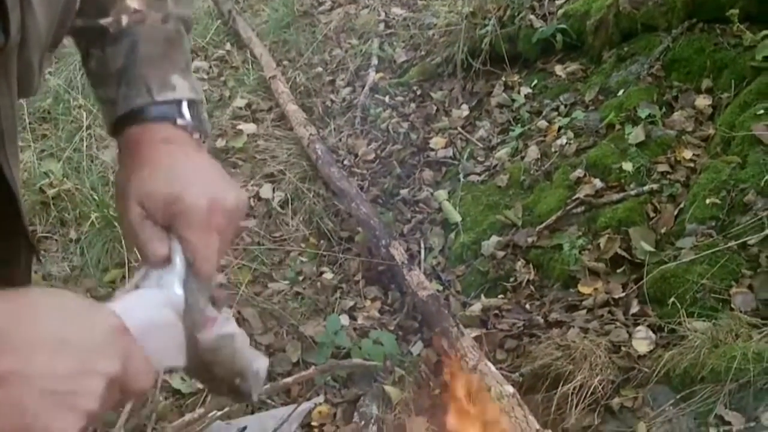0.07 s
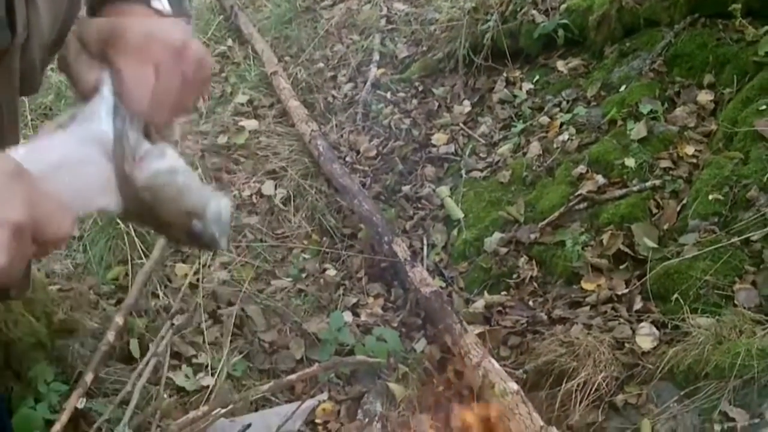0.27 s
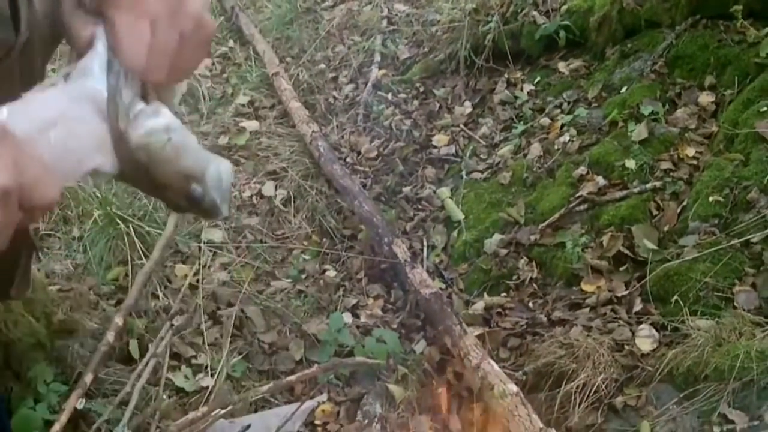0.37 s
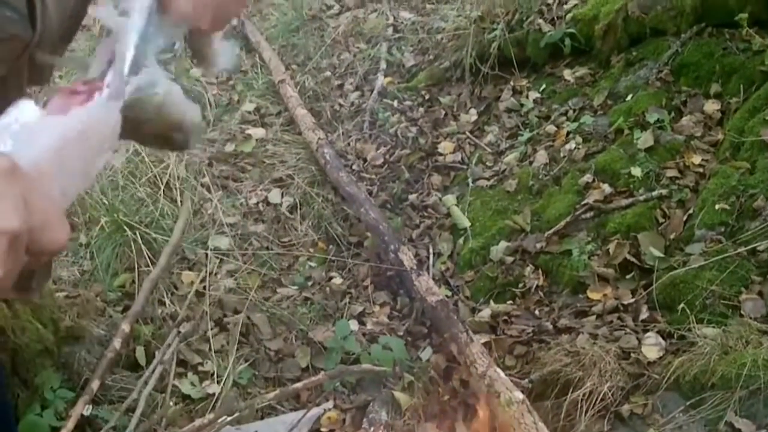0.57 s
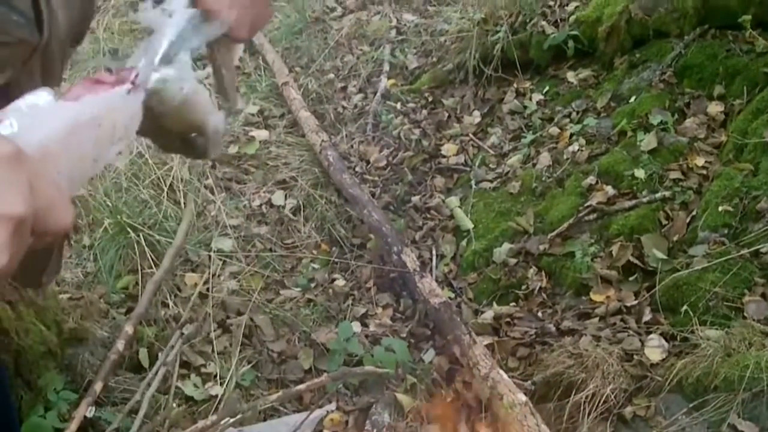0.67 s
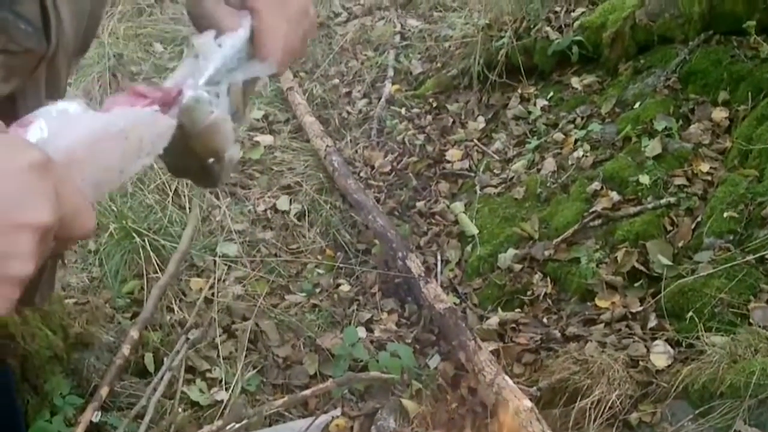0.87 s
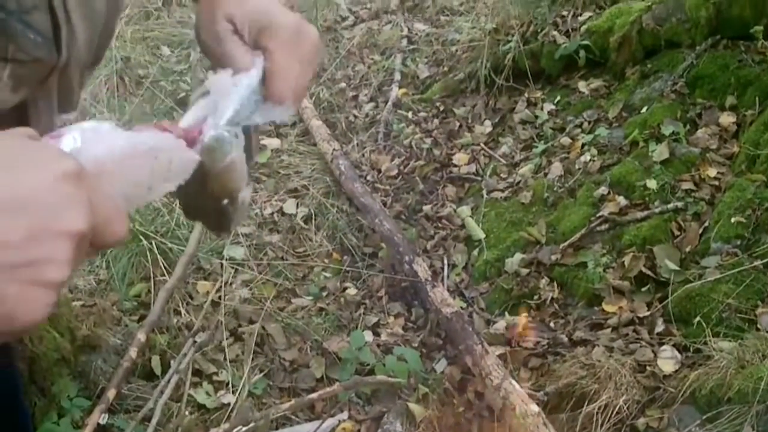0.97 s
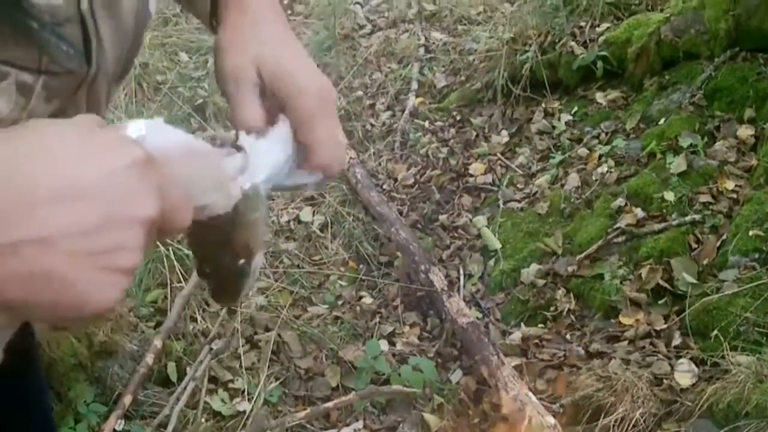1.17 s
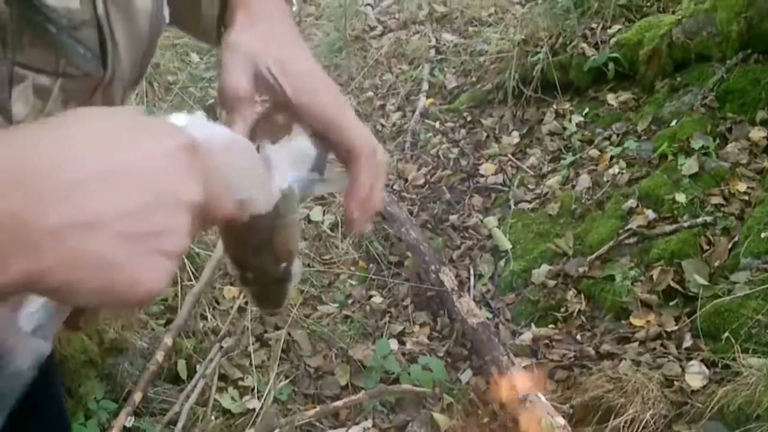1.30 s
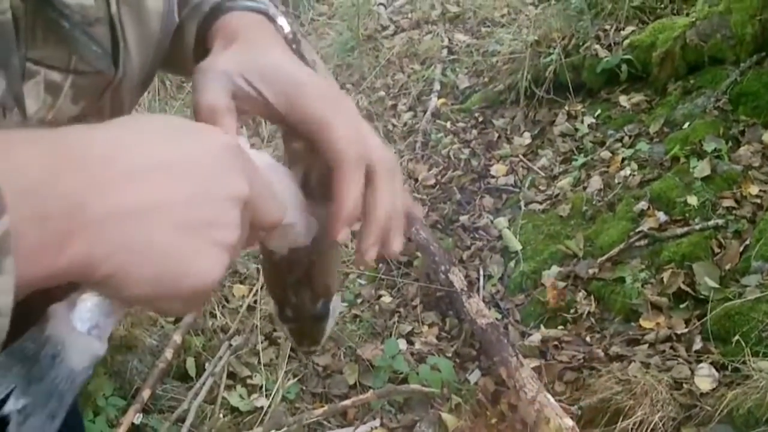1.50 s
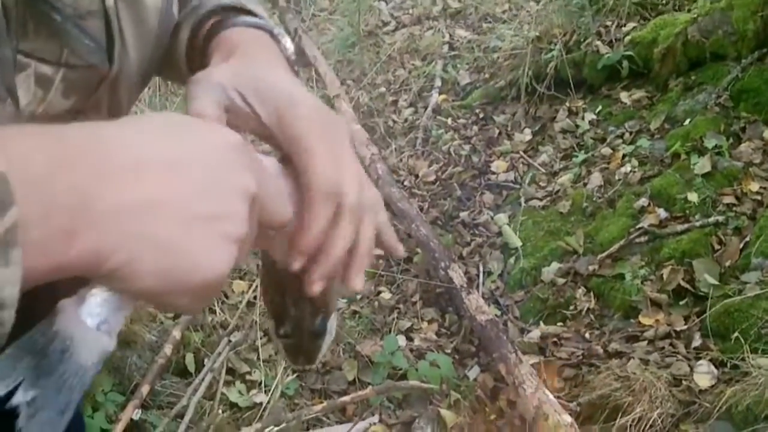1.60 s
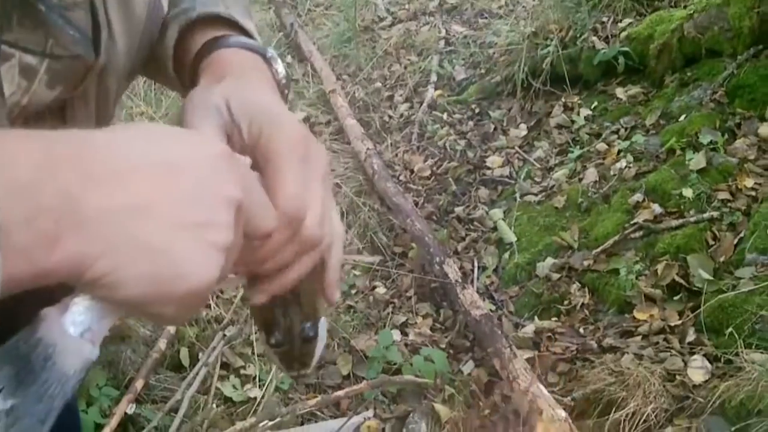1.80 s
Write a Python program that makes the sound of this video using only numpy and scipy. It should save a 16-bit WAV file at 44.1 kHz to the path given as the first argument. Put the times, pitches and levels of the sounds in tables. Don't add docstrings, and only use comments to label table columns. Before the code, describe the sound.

Fish skin is torn off by hand very close to the microphone: light ticks first, then a dense burst of sharp bright snaps and wet pops, then scattered cracks, over a quiet campfire rumble and sizzle outdoors.

```python
import sys
import numpy as np
from scipy import signal
from scipy.fft import rfft, irfft, next_fast_len
from scipy.io import wavfile
from scipy.ndimage import uniform_filter1d, map_coordinates

SR = 44100
rng = np.random.default_rng(int(sys.argv[2]) if len(sys.argv) > 2 else 0)


def dump(signal):
    limited = np.clip(np.atleast_2d(signal).T, -1, 1)
    pcm = np.round(limited * 32767).astype(np.int16)
    wavfile.write(sys.argv[1], SR, pcm)


def amplitude_ratio(level_db):
    exponent = np.asarray(level_db, float) / 20
    return 10 ** exponent


N = 81585
PRESENCE_DB = 16


def unit(x):
    return x / np.sqrt(np.mean(x ** 2) + 1e-20)


def curve(rows):
    time_s, value = np.transpose(rows)
    return np.interp(np.arange(N) / SR, time_s, value)


def wobble(rate):
    knots = rng.standard_normal(int(N * rate / SR) + 4)
    return map_coordinates(knots, [np.arange(N) * rate / SR])


def filtered(x, response):
    size = next_fast_len(N + 8192)
    spectrum = rfft(x, size) * response(np.fft.rfftfreq(size, 1 / SR))
    return irfft(spectrum, size)[..., :N]


def noise(points, channels):
    pitch_hz, level_db = np.transpose(points)

    def colour(hz):
        return amplitude_ratio(np.interp(np.log(hz + 1), np.log(pitch_hz), level_db))

    return unit(filtered(rng.standard_normal((channels, N)), colour))


def peak(hz, centre_hz, width_hz):
    return 1j * hz * width_hz / (centre_hz ** 2 - hz ** 2 + 1j * hz * width_hz)


def place(starts_s, rows):
    at = np.round(starts_s * SR).astype(int)[:, None] + np.arange(rows.shape[1])
    return np.bincount(at.ravel(), rows.ravel(), N + 4096)[:N]


def blips(table, tone, width, edge_db, tail_db, tail_s):
    start_s, level_db, pitch_hz, length_s = (c[:, None] for c in np.transpose(table))
    t, f = np.arange(1024) / SR, np.fft.rfftfreq(1024, 1 / SR)
    z = rng.standard_normal((len(table), 2, 1024))
    u = t / np.clip(length_s / 2.5, .00005, .002)
    rasp = irfft(rfft(z[:, 0]) * peak(f, pitch_hz, width * pitch_hz))
    rasp = rasp / rasp.std(axis=1, keepdims=True)
    ring = np.sin(2 * np.pi * pitch_hz * t)
    body = u * np.exp(1 - u) * (tone * ring + (1 - tone) * rasp)
    body = body / np.abs(body).max(axis=1, keepdims=True)
    tail = amplitude_ratio(tail_db - 60 * t / tail_s) * (1 - np.exp(-u)) * rasp
    edge = irfft(rfft(z[:, 1]) * peak(f, 6740, 34000))
    edge = amplitude_ratio(edge_db - 60 * t / 0.0013) * edge
    return place(start_s[:, 0], amplitude_ratio(level_db) * (body + tail + edge))


def grains(count, mean_hz, spread, cycles, size_db):
    u, g = rng.random((count, 2)), rng.standard_normal((count, 1))
    hz = np.clip(mean_hz * np.exp(spread * g), 300, 15000)
    t = np.arange(256) / SR
    size = amplitude_ratio(-size_db * np.log(1 - u[:, 1:]))
    swell = (1 - np.exp(-t * hz)) * np.exp(-t * hz / cycles)
    return unit(place(u[:, 0] * N / SR, size * np.sin(2 * np.pi * hz * t) * swell))


def fire():
    # pitch_hz [Hz], level_db [dB per Hz]
    roar_colour = [(15, -48), (30, 5), (70, 0.5), (130, -6.5), (280, -14), (500, -26), (900, -30),
                   (2000, -89)]
    # pitch_hz [Hz], level_db [dB per Hz]
    sizzle_colour = [(300, 4), (1000, 5), (3500, -2.5), (6500, -5), (10000, -3.5), (16000, -7)]
    # time_s [s], level_db [dB]
    sizzle_level = [(0, -52.5), (.5, -52), (1.0, -55), (1.85, -57)]
    roar = amplitude_ratio(-44 + 0.5 * wobble(12.67)) * noise(roar_colour, channels=1)[0]
    sizzle = amplitude_ratio(curve(sizzle_level) + 0.7 * wobble(15)) * noise(sizzle_colour, channels=1)[0]
    return roar + sizzle


def jolts():
    # start_s [s], level_db [dB], pitch_hz [Hz]
    thuds = [
        (0.23, -37, 166),
        (0.497, -35.5, 266),
        (0.952, -33, 27),
        (1.043, -30, 196),
        (1.413, -29.5, 41.1),
        (1.829, -41, 290),
    ]
    start_s, level_db, pitch_hz = (c[:, None] for c in np.transpose(thuds))
    t = np.arange(4000) / SR
    puff = rng.standard_normal((len(thuds), 4000))
    puff = uniform_filter1d(uniform_filter1d(puff, size=70), size=70)
    puff = amplitude_ratio(1) * unit(puff) * (pitch_hz > 100)
    u = t * pitch_hz / 1.6
    swell = np.e * 3 * u * np.exp(-3 * u)
    return place(start_s[:, 0], amplitude_ratio(level_db) * swell * (np.sin(2 * np.pi * pitch_hz * t) + puff))


def squeak():
    start_s, long_s, pitch_hz, rise_hz, rise_s = .574, .08, 1110, 90, .01
    since = np.clip((np.arange(N) / SR - start_s) / long_s, 0, 1)
    hz = pitch_hz - rise_hz * np.exp(-since * long_s / rise_s)
    swell = np.sqrt(np.abs(np.sin(np.pi * since)))
    return amplitude_ratio(-51.5) * swell * np.sin(2 * np.pi * np.cumsum(hz) / SR)


def slaps():
    # start_s [s], level_db [dB], pitch_hz [Hz], fade_s [s to fall 60 dB]
    flaps = [
        (.0613, -30.5, 1310, 0.013),
        (.2257, -19.5, 1010, 0.022),
        (.2345, -24, 1090, 0.018),
        (.6888, -32, 1070, 0.0065),
        (.9205, -31, 1950, 0.041),
        (1.041, -33, 1730, 0.022),
        (1.1355, -34, 3280, 0.0066),
        (1.278, -35, 1490, 0.012),
        (1.7853, -31.5, 2980, 0.0072),
        (1.8287, -29.5, 1330, 0.02),
    ]
    start_s, level_db, pitch_hz, fade_s = (c[:, None] for c in np.transpose(flaps))
    t, f = np.arange(2048) / SR, np.fft.rfftfreq(2048, 1 / SR)
    z = rng.standard_normal((len(flaps), 3, 2048))
    fade = amplitude_ratio(-60 * t / np.clip(fade_s, .002, .021))
    bits = amplitude_ratio(2.5 * unit(uniform_filter1d(z[:, 1], size=24)))
    rasp = irfft(rfft(z[:, 0] * bits * fade) * peak(f, pitch_hz, .9 * pitch_hz))
    rasp = rasp / np.abs(rasp).max(axis=1, keepdims=True)
    ring = np.sin(2 * np.pi * pitch_hz * t) * fade ** 2
    crack = amplitude_ratio(-30 - 60 * t / .003) * z[:, 2]
    rows = .3 * ring + .7 * rasp + crack
    rows = rows / np.abs(rows).max(axis=1, keepdims=True)
    return place(start_s[:, 0] + .0006, amplitude_ratio(level_db) * rows)


def pops():
    # start_s [s], level_db [dB], pitch_hz [Hz], length_s [s]
    pockets = [(.104, -35, 1110, 0.00072), (.1238, -29, 1610, 0.00058), (.146, -28.5, 1510, 0.00081),
               (.399, -33.5, 2730, 0.00077), (.4619, -29.5, 1440, 0.0015), (.4645, -29, 2070, 0.0017),
               (.471, -20.5, 1770, 0.0005), (.4763, -22.5, 2100, 0.0017), (.4873, -28.5, 1400, 0.0037),
               (.4964, -21.5, 2050, 0.00036), (.5009, -29, 1880, 0.0014), (.5183, -19.5, 2000, 0.00097),
               (.5275, -22.5, 2550, 0.00077), (.5321, -16, 2260, 0.00035), (.5377, -27, 2300, 0.0011),
               (.5529, -24, 2070, 0.00086), (.5583, -20.5, 2000, 0.00062), (.6582, -26, 2000, 0.0017),
               (.6779, -33, 2100, .0016), (.7502, -38, 3030, 0.00096), (.7737, -33, 3170, 0.0018),
               (.7805, -40, 3240, 0.0028), (.8135, -33.5, 2040, 0.0033), (.8186, -24, 1930, .0014),
               (.8229, -27.5, 1960, 0.0013), (.863, -34.5, 1600, 0.001)]
    return blips(pockets, tone=.8, width=.15, edge_db=-45, tail_db=-18, tail_s=.022)


def pull():
    # start_s [s], hold_s [s]
    rips = [(.094, .06), (.227, .05), (.3, .03), (.345, .1), (.458, .101), (.575, .03), (.646, .055),
            (.751, .055), (.81, .022), (.84, .035), (.921, .025), (1.0, .13), (1.17, .11), (1.298, .016)]
    rip_levels = [-42, -38.5, -42, -37, -27, -39.5, -41, -38, -32.5, -45.5, -35.5, -49.5, -46.5, -43.5]
    start_s, hold_s, level_db = (c[:, None] for c in np.vstack([np.transpose(rips), rip_levels]))
    t = np.arange(N) / SR - start_s
    fall_db = 60 * np.clip(t - hold_s, 0, 9) / .06
    rise = np.clip(t / .003, 0, 1)
    return np.sum(amplitude_ratio(level_db - fall_db) * rise, axis=0)


def crackle():
    force, count = pull(), 4000
    dry_ticks = grains(count, mean_hz=6900, spread=.22, cycles=1.1, size_db=3.5)
    wet_ticks = grains(count // 3, mean_hz=2140, spread=0.24, cycles=0.94, size_db=2.5)
    still_wet = np.arange(N) < .9 * SR
    soak = force.max() * (force / force.max()) ** 1.13 * amplitude_ratio(-11.5) * still_wet
    return force * amplitude_ratio(1.5 - PRESENCE_DB + 2.5 * wobble(90)) * dry_ticks + soak * wet_ticks


def small_fibres():
    # start_s [s], level_db [dB], pitch_hz [Hz]
    fibres = [(0.0623, -25.3, 5790.0), (0.0694, -25.9, 7920.0), (0.0962, -21.3, 6800.0),
              (0.104, -20.4, 7190.0), (0.1201, -24.1, 6570.0), (0.1221, -19.6, 6330.0),
              (0.1238, -25.2, 6930.0), (0.1439, -24.7, 7130.0), (0.146, -26.1, 7340.0),
              (0.199, -12.3, 9260.0), (0.2263, -12, 6300), (0.229, -20.5, 7450.0), (0.2301, -25.2, 7190.0),
              (0.2371, -16.4, 7800.0), (0.2388, -22.5, 6570.0), (0.2518, -15.8, 5510.0),
              (0.2758, -25.5, 6590.0), (0.3023, -24.7, 6220.0), (0.3455, -24, 6900),
              (0.3559, -16.5, 5600.0), (0.3742, -20.3, 7690.0), (0.3756, -25.2, 7040.0),
              (0.3977, -22.0, 6420.0), (0.3993, -21.7, 6720.0), (0.4054, -24.7, 7060.0),
              (0.4198, -18.4, 7190.0), (0.4233, -23.3, 7130.0), (0.4268, -25.5, 6610.0),
              (0.4289, -22.4, 7470.0), (0.4514, -16.6, 7730.0), (0.4562, -18.0, 6650.0),
              (0.4592, -13.0, 7880.0), (0.461, -19.9, 6400.0), (0.4672, -18.9, 6120.0),
              (0.4687, -23.3, 6720.0), (0.473, -15.2, 6500.0), (0.4763, -10.7, 8380.0),
              (0.4782, -15.3, 6290.0), (0.4794, -16.8, 6610.0), (0.4824, -19.7, 7750.0),
              (0.4896, -20.0, 6720.0), (0.4945, -22.0, 7060.0), (0.4969, -20.2, 7320.0),
              (0.4981, -19.3, 6420.0), (0.5038, -14.0, 7260.0), (0.5058, -16.8, 6240.0),
              (0.5078, -15.1, 6870.0), (0.5103, -14.1, 5990.0), (0.5211, -22.0, 6630.0),
              (0.5246, -20.7, 6500.0), (0.5295, -16.3, 6270.0), (0.5313, -20.1, 6650.0)]
    # start_s [s], level_db [dB], pitch_hz [Hz]
    tugs = [(0.5329, -14.8, 7320.0), (0.5448, -19.2, 6570.0), (0.5498, -18.6, 7490.0),
            (0.5531, -15.4, 7210.0), (0.5914, -21.9, 6800.0), (0.651, -26.7, 7300.0),
            (0.6578, -17.3, 7040.0), (0.6628, -23.1, 7000.0), (0.674, -15, 8400), (0.6917, -19.3, 7260.0),
            (0.693, -24.3, 7710.0), (0.6975, -23.8, 6870.0), (0.7503, -14, 5200), (0.7507, -16.5, 6850.0),
            (0.755, -22.7, 7280.0), (0.7632, -26.0, 6870.0), (0.7738, -14.6, 5230.0),
            (0.7931, -15.4, 9240.0), (0.7995, -24.4, 7060.0), (0.8112, -19.6, 6980.0),
            (0.8132, -17.4, 6800.0), (0.8206, -19.0, 5430.0), (0.823, -18.8, 6780.0),
            (0.825, -20.2, 6420.0), (0.8297, -24.4, 6570.0), (0.8559, -19.6, 9410.0), (0.9013, -27, 6910),
            (0.9223, -13.9, 7860.0), (0.9251, -21.1, 6930.0), (0.9289, -21.8, 8030.0),
            (0.9317, -24.3, 6680.0), (0.934, -25.5, 7470.0), (0.9368, -26.5, 6800.0), (1.0387, -12, 10400),
            (1.0433, -16, 9540), (1.045, -23.1, 6720.0), (1.1363, -12, 10000), (1.1365, -16, 4300),
            (1.139, -19, 7880), (1.2168, -27, 7200), (1.2309, -25.1, 7670.0), (1.2792, -22.0, 7260.0),
            (1.3001, -25, 6610), (1.306, -21.3, 6240.0), (1.3098, -19.5, 6440.0), (1.3114, -21.4, 5680.0),
            (1.4704, -28, 6330), (1.4935, -26, 7470), (1.7652, -25.7, 7620.0), (1.7861, -12, 11000),
            (1.8297, -16.0, 6980.0)]
    small = [(*row, 0.00028) for row in fibres + tugs]
    pings = blips(small, tone=1, width=0.34, edge_db=-5.5, tail_db=-22.5, tail_s=0.011)
    return pings * amplitude_ratio(3.0 - PRESENCE_DB)


def snaps():
    # start_s [s], level_db [dB], pitch_hz [Hz], length_s [s]
    strong = [(0.2275, -18, 6860, 0.00028), (0.2353, -7.5, 7500, 0.00025), (0.2701, -10, 7900, 0.00032),
              (0.272, -11, 6520.0, 0.00052), (0.3725, -6.5, 6800.0, 0.00035), (0.422, -9.5, 7140, 0.00036),
              (0.4625, -11, 7100, 0.00034), (0.4647, -5.5, 6600, 0.00016), (0.4749, -4, 7210.0, 0.00016),
              (0.4837, -16, 6780.0, 0.00082), (0.5007, 6, 8940, 0.00027), (0.502, -14, 7660, 0.00034),
              (0.5127, -7.5, 6070, 0.00069), (0.5179, 0.5, 5910, 0.0011), (0.5263, -6, 6630.0, 0.00028),
              (0.5278, -5.5, 7100, 0.00058), (0.5356, -7, 6950, 0.00045), (0.5374, -7, 7200, 0.00014),
              (0.5429, -24, 7400, 0.00028), (0.5476, -15, 7300, 0.0003), (0.5583, -16.5, 7000, 0.00096),
              (0.5594, -8.5, 6660, 0.00058), (0.6898, -7.1, 8200, 0.00042), (0.8162, -17.5, 6640, 0.00034),
              (0.8186, -12, 6850, 0.00081), (1.0133, -13, 6900, 0.00038), (1.0388, -17.5, 6930.0, 0.0005),
              (1.0417, -6, 6610.0, 0.00035), (1.1366, -18.5, 7250, 0.0012), (1.7862, -12.5, 6500, 0.00033)]
    cracks = blips(strong, tone=0.88, width=0.9, edge_db=-1, tail_db=-16.5, tail_s=0.024)
    return cracks * amplitude_ratio(2.0 - PRESENCE_DB)


def scene():
    hands = jolts() + squeak()
    skin = slaps() + pops() + crackle() + small_fibres() + snaps()
    return np.tile(fire() + hands + skin, (2, 1))


def roll_off(x):
    return signal.sosfilt(signal.butter(12, 16500, fs=SR, output="sos"), x)


def record(dry):
    # pitch_hz [Hz], level_db [dB per Hz]
    hiss_colour = [(25, -4), (180, 2.5), (700, 4), (2500, -1.5), (6000, 0.5), (16000, 0)]
    x = filtered(dry, lambda hz: 1 + (amplitude_ratio(PRESENCE_DB) - 1) * peak(hz, 6800, 1960))
    swell = np.sqrt(np.abs(uniform_filter1d(x[0] ** 2, size=900)))
    hiss_level = amplitude_ratio(-62) + amplitude_ratio(-27.5) * swell
    x = x + hiss_level * noise(hiss_colour, channels=2)
    x = filtered(x, lambda hz: hz < 15950)
    return roll_off(np.clip(x, -1, 1))


dry = scene()
out = record(dry)
dump(out)
```